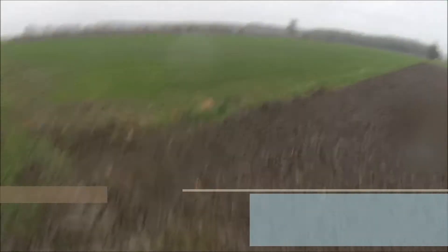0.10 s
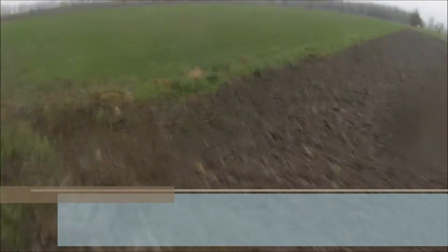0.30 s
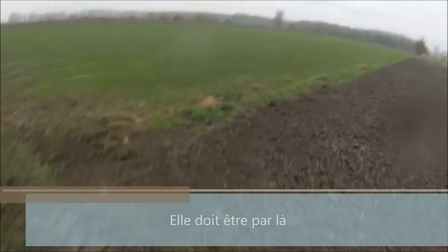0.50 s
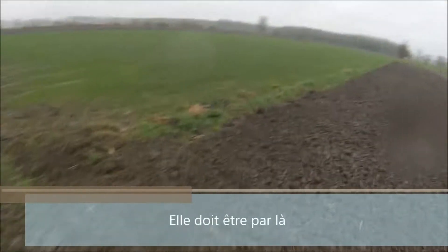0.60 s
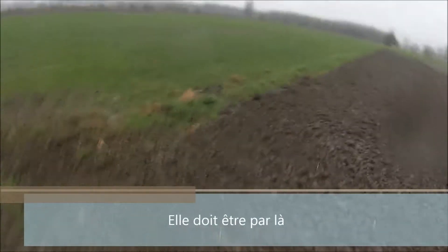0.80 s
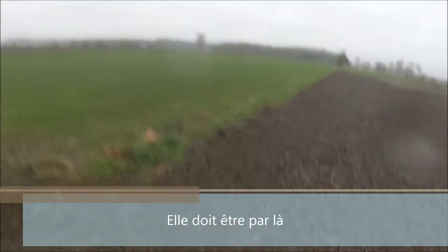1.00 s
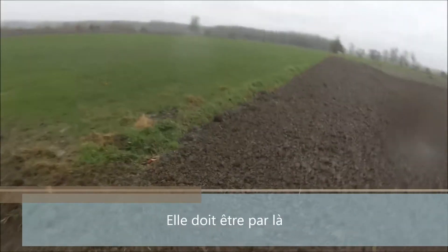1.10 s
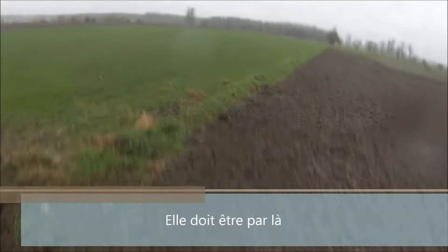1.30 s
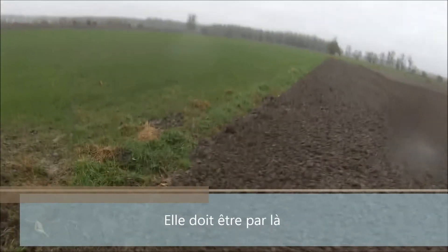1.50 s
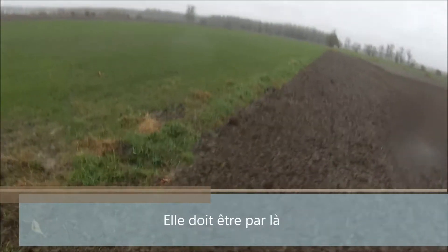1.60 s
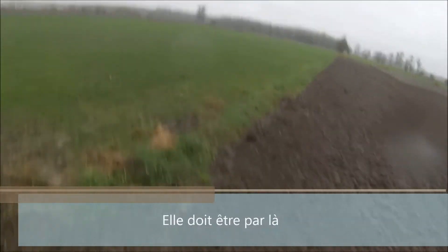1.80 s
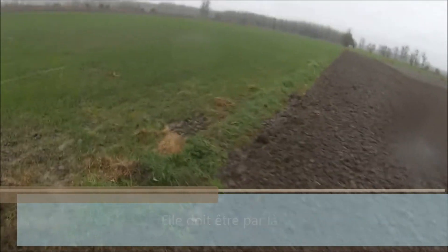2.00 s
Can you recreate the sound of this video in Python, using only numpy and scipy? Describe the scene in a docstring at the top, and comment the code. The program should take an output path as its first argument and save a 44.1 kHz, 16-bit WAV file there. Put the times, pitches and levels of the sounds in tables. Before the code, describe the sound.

Raindrops tick irregularly on the plastic housing of the microphone, over a fine patter and a soft hiss of rain on a field. Sharper ticks stand out at the start, near 0.5 and 1.1 seconds, and loudest around 2 seconds. Deep, soft footsteps with a faint squish land at about 0.3, 0.7, 1.1 and 1.6 seconds, the third much weaker. A low air rumble swells with each stride.

```python
"""A muddy field track in light rain, where someone walks with the microphone in a plastic housing.
The bed is the hiss of rain on the field and a low rumble of moving air that swells with each stride.
Up close, single drops tick on the housing and set its walls ringing, over a patter of fine droplets.
Each footfall lands as a deep, soft thud with a faint squish of wet earth."""
import sys
import numpy as np
from scipy import signal
from scipy.fft import rfft, irfft
from scipy.io import wavfile

SR = 44100
rng = np.random.default_rng(int(sys.argv[2]) if len(sys.argv) > 2 else 0)


def wav_record(signal):
    """Record a signal, one row per channel, as 16-bit PCM in the file named by sys.argv[1]."""
    frames = np.transpose(np.atleast_2d(signal))
    bounded = np.clip(frames, -1, 1)
    # unit amplitude maps onto the largest positive 16-bit level
    quanta = np.round(bounded * 32767).astype(np.int16)
    wavfile.write(sys.argv[1], SR, quanta)


N = 92610
TIME, DROP_TIME = np.arange(N) / SR, np.arange(int(.07 * SR)) / SR

# tone of the rain on the field: (frequency [Hz], relative level per Hz [dB])
HISS_SPECTRUM = [(60, -9.5), (130, 0), (290, 2.5), (550, -3), (1000, -6.5), (1350, -6.5), (1750, -6.5),
                 (2300, -8), (3200, -13), (4500, -13), (6500, -18), (10000, -22), (14500, -26),
                 (16000, -33)]
# tone of the air and handling rumble: (frequency [Hz], relative level per Hz [dB])
RUMBLE_SPECTRUM = [(12, 0.5), (25, -1.5), (52, -1), (70, -22.5), (100, -31), (200, -36.5), (500, -83)]
# fader ride of the rumble: (time [s], level [dB])
RUMBLE_RIDE = [(0, -48.5), (.12, -49), (.2, -35.5), (.4, -39.5), (.52, -53), (.64, -40), (.8, -38),
               (.95, -52.5), (1.02, -37), (1.26, -39), (1.35, -49.5), (1.45, -47), (1.57, -39.5),
               (1.76, -36.5), (1.87, -58), (2.1, -48)]
# drop hits on the housing: (time [s], lower wall mode [Hz], its level [dB], upper wall mode [Hz],
# its level [dB], splash [dB], spray [dB], after-ring before softening [dB re upper mode])
DROP_HITS = [(0.0075, 1700, -54, 2190.0, -67, -58, -75, -18),
             (0.02, 1830, -51.5, 2120, -47.5, -52, -84, -2),
             (0.0288, 1804, -30, 2330.0, -30.5, -47, -83, -15),
             (0.11, 1770, -58, 2550.0, -52.5, -56, -64, -18),
             (0.1333, 1650, -35, 2060, -29.5, -69, -80, -11),
             (0.2191, 1750, -40, 2350, -43, -50, -61.5, -7), (0.229, 1760, -45, 2480, -38, -56, -62, -8),
             (0.2392, 2020, -56, 2310, -60, -56, -75, -15), (0.2645, 1700, -39, 2430, -43.5, -53, -58, -6),
             (0.3612, 1700, -59, 2370, -51, -69, -81, -9),
             (0.3845, 1700, -52.5, 2270, -54.5, -62, -66, -16),
             (0.4401, 1820, -58, 2210, -53.5, -71, -80, -5),
             (0.5147, 1590, -30, 2830, -30.5, -37, -46.5, -12),
             (0.5416, 1900.0, -64, 2840.0, -66, -62, -75, -18),
             (0.5617, 1500.0, -59.5, 2540, -55.5, -66, -72, -15),
             (0.5846, 1780.0, -64, 2360.0, -60, -61, -79, -18),
             (0.6374, 1660, -58.5, 2300.0, -72, -59, -64.5, -18),
             (0.772, 1660.0, -73, 2510.0, -85, -66, -86, -18),
             (0.8055, 1720, -51.5, 2080.0, -69, -76, -79, -18),
             (0.8559, 1800, -49, 2100, -55, -57, -71, -16), (0.867, 1690, -53.5, 2070, -68, -73, -84, -18),
             (0.8952, 1930.0, -70, 2260, -61.5, -79, -83, -14),
             (1.0109, 1660, -56, 2060, -55.5, -81, -89, -18),
             (1.0549, 1790, -33.5, 2550, -29.5, -36.5, -47.5, -10),
             (1.0884, 1690, -51.5, 2640, -47, -62.5, -64, -20),
             (1.2215, 1620, -47.5, 2660, -47, -62.5, -86, -15),
             (1.2653, 1870, -57.5, 2040, -60, -82, -82, -18),
             (1.416, 1790, -57, 2500, -59, -64.5, -76, -18),
             (1.488, 1880.0, -57.5, 2680, -47.5, -53.5, -63.5, -10),
             (1.5367, 1790.0, -79, 2270.0, -49.5, -72, -74, -16),
             (1.539, 1900, -53.5, 2470.0, -54, -54.5, -70, -18),
             (1.6221, 1876, -47.5, 2500, -43, -42.5, -66, -7.5),
             (1.6393, 1790.0, -58, 2880, -54.5, -55, -62, -18),
             (1.701, 1820, -53, 2600, -53, -68, -78, -11), (1.7499, 1980, -75, 2620, -45, -53, -67, -8.5),
             (1.8818, 1960.0, -72, 2340, -42, -53, -74, -8),
             (1.932, 1500, -45.5, 2900, -46.5, -53.5, -61, -6),
             (1.946, 1850.0, -65, 2140.0, -72, -73, -86, -18),
             (1.9652, 1740, -24.5, 2475, -21, -33.5, -40, -13),
             (2.0132, 1640.0, -54, 2390.0, -50, -63, -89, -13),
             (2.0274, 1624, -21.5, 2620, -23.5, -33, -38, -16.5)]
# bright snap of the splash: (frequency [Hz], relative level [dB], t60 [s])
SPLASH_MODES = [(3720, -1.5, 0.011), (4420, -6.5, 0.0093), (5317, 6, 0.0068), (5920, -0.5, 0.0094),
                (7050, 7, 0.0034), (7620, -2.5, 0.0067)]
# sparkle of the finest spray: (frequency [Hz], relative level [dB], t60 [s])
SPRAY_MODES = [(9200, 5, 0.004), (9330, -12, 0.0075), (10140, 3, 0.0028), (12100, -3, 0.0041),
               (13300, -5, 0.0027)]
# faint after-ring of the housing: (frequency [Hz], relative level [dB], t60 [s])
RING_MODES = [(1883, -7, .05), (2150, 0.5, 0.035), (3070, -10.5, 0.037), (6450, -27, 0.028)]
# footfalls: (time [s], thud peak [dB], thud pitch [Hz], rebound [dB re thud], squelch [dB], fizz [dB])
FOOTFALLS = [(.263, -9, 28.8, -11, -50, -48), (0.685, -12, 38.1, -11.5, -54.5, -57.5),
             (1.112, -29.5, 35.8, 5, -69, -62.5), (1.639, -16.5, 28.9, -9.5, -59, -57.5)]
# dull squelch of mud: (frequency [Hz], relative level per Hz [dB])
SQUELCH_SPECTRUM = [(70, -8.5), (130, 0), (280, -3.5), (500, -11), (900, -20), (2000, -41)]
# fizz of water pressed out underfoot: (frequency [Hz], relative level per Hz [dB])
FIZZ_SPECTRUM = [(500, -6), (1200, -3), (2000, 4.5), (3500, -6), (6500, -9), (10000, -19.5), (16000, -42)]

HISS_DB, HISS_FLICKER_DB = -62, 2.23
LOWER_T60_S, UPPER_T60_S, WALL_ATTACK_S, WALL_DELAY_S = 0.0077, 0.0037, 0.00083, .0001
WALL_LOWPASS = signal.butter(4, 3710, fs=SR, output="sos")
CONTACT_S, TAP_S, TAP_DB = 0.00054, 0.00054, -15.5
STRETCH_PER_DB, SOFT_GAP_DB = 0.011, 23.5
DROPLETS_PER_S, DROPLET_FLOOR_DB, DROPLET_SPREAD_DB, DROPLET_WALL_HZ = 110, -76.5, 4.5, (1736, 2340)
THUD_CYCLES, HEEL_DB, HEEL_HZ, REBOUND_DELAY_S, REBOUND_HZ = 0.59, -21.5, 71.3, 0.0372, 36.2
SQUELCH_WIDTH_S, FIZZ_LEAD_S, FIZZ_WIDTH_S, FIZZ_GRAIN_DB = 0.028, 0.0091, 0.016, 4
HIGH_CUT_HZ = 16300


def from_db(db):
    """Decibels to gain."""
    return 10 ** (np.asarray(db) / 20)


def add(out, start_s, sound):
    """Lay a sound into the track at its cue."""
    i = int(np.clip(start_s * SR, 0, N - 1))
    out[i:i + len(sound)] += sound[:N - i]


def noise(spectrum):
    """Noise of rms 1, shaped to the given spectrum."""
    hz, db = np.transpose(spectrum)
    bin_hz = np.arange(N // 2 + 1) * SR / N
    gain = from_db(np.interp(np.log(bin_hz + 1e-9), np.log(hz), db))
    shaped = irfft(rfft(rng.standard_normal(N)) * gain, N)
    return shaped / shaped.std()


def flicker(per_s):
    """A random modulator with spread near 1 and per_s new values a second."""
    return np.interp(TIME * per_s, np.arange(N), rng.standard_normal(N))


def field_hiss():
    """Rain on grass and earth blurs into a soft, lightly flickering hiss."""
    return from_db(HISS_DB + HISS_FLICKER_DB * flicker(per_s=59.8)) * noise(HISS_SPECTRUM)


def air_rumble():
    """Air and handling rumble that swells with each stride."""
    level_db = np.interp(TIME, *np.transpose(RUMBLE_RIDE))
    return from_db(level_db) * noise(RUMBLE_SPECTRUM)


def unit_tick(tick, window_s=.005):
    """Scale a tick to the energy of rms 1 held for window_s."""
    return tick / np.sqrt(np.sum(tick ** 2) / (window_s * SR) + 1e-20)


def mode(hz, t60, phase_cycles):
    """One resonance: a sine that falls 60 dB in t60 seconds."""
    return np.sin(2 * np.pi * (hz * DROP_TIME + phase_cycles)) * from_db(-60 * DROP_TIME / t60)


def modes(table, detune, uneven_db=2.5):
    """A bank of resonances, struck a little differently each time."""
    bank = 0
    for hz, db, t60 in table:
        gain = from_db(db + uneven_db * rng.normal())
        bank += gain * mode(hz * (1 + detune * rng.normal()), t60, rng.random())
    return bank


def wall_mode(hz, t60, swell):
    """One damped mode of the plastic wall: it swells, dies fast and has a dull top."""
    return unit_tick(signal.sosfilt(WALL_LOWPASS, swell * mode(hz, t60, 0) + 1e-18))


def drop(lower_hz, lower_db, upper_hz, upper_db, splash_db, spray_db, ring_db):
    """One drop: splash, spray and a dull tap as attack, two wall modes as body, a faint ring as tail."""
    contact = 1 - np.exp(-DROP_TIME / CONTACT_S)   # the splash rises as the drop flattens
    swell = 1 - np.exp(-np.maximum(DROP_TIME - WALL_DELAY_S, 0) / WALL_ATTACK_S)
    # a drop with less spray lands softly: the walls ring longer and the after-ring is weaker
    stretch = 1 + np.clip(STRETCH_PER_DB * (upper_db - spray_db - SOFT_GAP_DB), 0, 1)
    lower = from_db(lower_db) * wall_mode(lower_hz, LOWER_T60_S * stretch, swell)
    upper = from_db(upper_db) * wall_mode(upper_hz, UPPER_T60_S * stretch, swell)
    splash = from_db(splash_db) * unit_tick(contact * modes(SPLASH_MODES, detune=0.035))
    spray = from_db(spray_db) * unit_tick(contact * modes(SPRAY_MODES, detune=0.059))
    tap = from_db(lower_db + TAP_DB) * unit_tick(DROP_TIME * np.exp(-DROP_TIME / TAP_S))
    ring_gain = from_db(upper_db + ring_db) / stretch ** 2
    ring = ring_gain * unit_tick(swell * modes(RING_MODES, detune=0.0025))
    return lower + upper + splash + spray + tap + ring


def large_drops():
    """The foreground ticks: large drops striking the housing."""
    out = np.zeros(N)
    for start_s, *hit in DROP_HITS:
        add(out, start_s, drop(*hit))
    return out


def droplets():
    """Fine droplets land at random, a faint patter between the large drops."""
    out = np.zeros(N)
    for _ in range(int(DROPLETS_PER_S * N / SR)):
        db = DROPLET_FLOOR_DB + DROPLET_SPREAD_DB * min(rng.exponential(), 3)
        lower_hz, upper_hz = np.array(DROPLET_WALL_HZ) * (1 + 0.094 * rng.normal(size=2))
        tilt_db, bright_db = 2.1 * rng.normal(size=2)
        start_s = rng.random() * N / SR
        tick = drop(lower_hz, db + tilt_db, upper_hz, db - tilt_db,
                    splash_db=db + bright_db - 11.5, spray_db=db + bright_db - 21, ring_db=-16)
        add(out, start_s, tick)
    return out


def jolt(centre_s, hz):
    """One smooth down-and-up swing of pressure, peak 1."""
    cycles = (TIME - centre_s) * hz
    swing = np.sin(2 * np.pi * cycles) * np.exp(-(cycles / THUD_CYCLES) ** 2)
    return swing / swing.max()


def footsteps():
    """Each footfall jolts the housing, rebounds once, squelches in mud and presses out a fizz of water."""
    out = np.zeros(N)
    mud = noise(SQUELCH_SPECTRUM)
    water = noise(FIZZ_SPECTRUM) * from_db(FIZZ_GRAIN_DB * flicker(per_s=450))
    for step_s, thud_db, thud_hz, rebound_db, squelch_db, fizz_db in FOOTFALLS:
        heel = from_db(HEEL_DB) * jolt(step_s, HEEL_HZ)   # a quicker knock inside the thud
        rebound = from_db(rebound_db) * jolt(step_s + REBOUND_DELAY_S, REBOUND_HZ)
        out += from_db(thud_db) * (jolt(step_s, thud_hz) + heel + rebound)
        out += from_db(squelch_db) * mud * np.exp(-((TIME - step_s) / SQUELCH_WIDTH_S) ** 2)
        out += from_db(fizz_db) * water * np.exp(-((TIME - step_s + FIZZ_LEAD_S) / FIZZ_WIDTH_S) ** 2)
    return out


def scene():
    """The mono mix: close drops and footsteps over the bed of rumble and hiss."""
    return (large_drops() + droplets() + footsteps() + air_rumble() + field_hiss())[None]


def record(dry):
    """A steep high cut on the whole mix."""
    return signal.sosfilt(signal.ellip(10, .1, 80, HIGH_CUT_HZ, fs=SR, output="sos"), dry)


dry = scene()
out = record(dry)
wav_record(out)
```